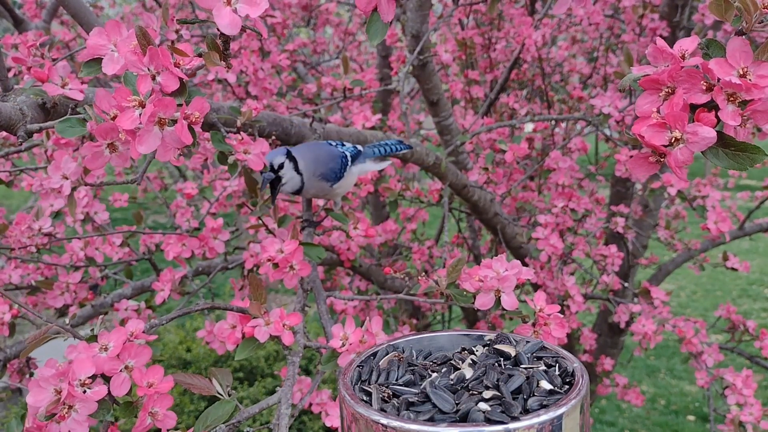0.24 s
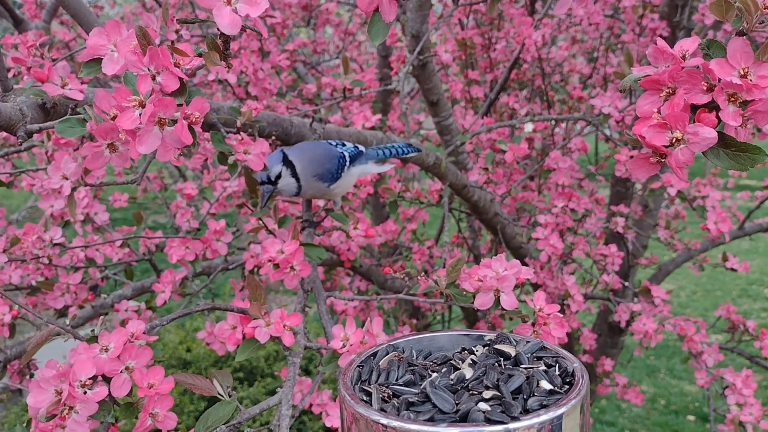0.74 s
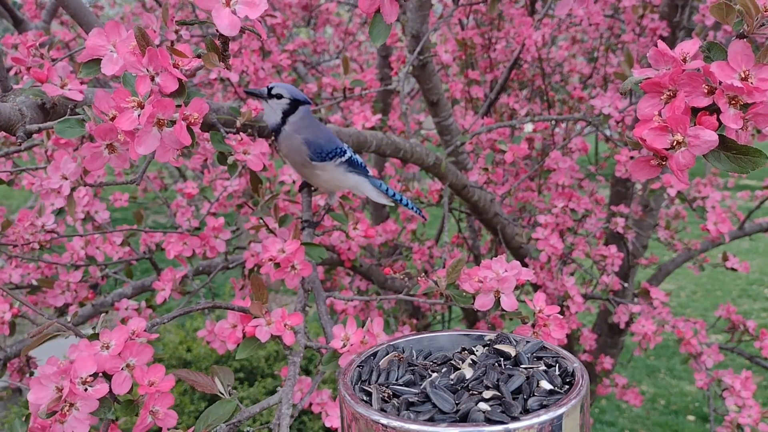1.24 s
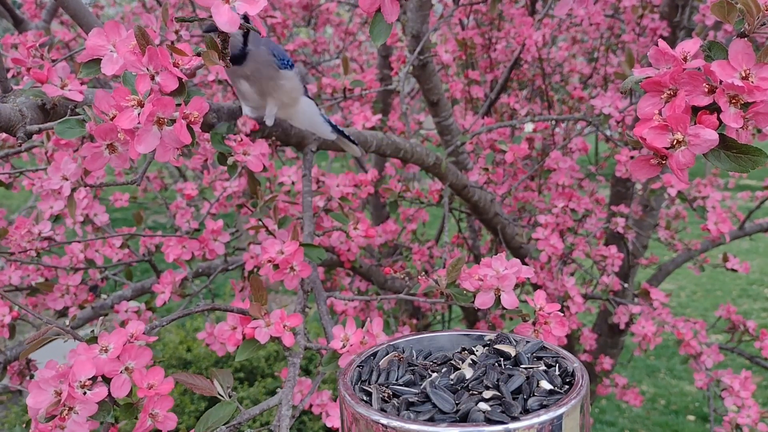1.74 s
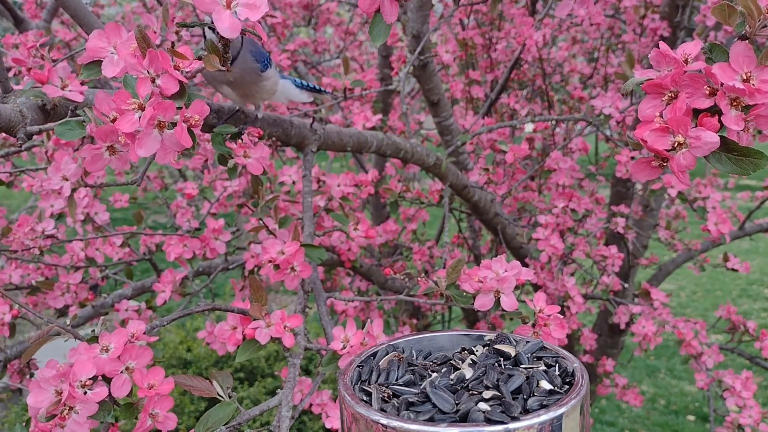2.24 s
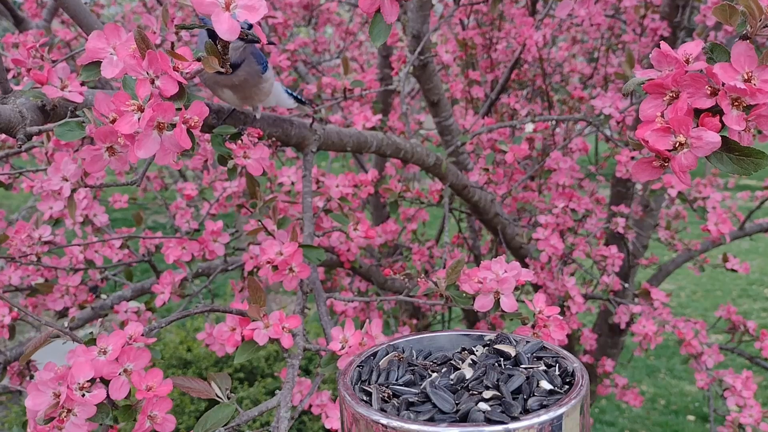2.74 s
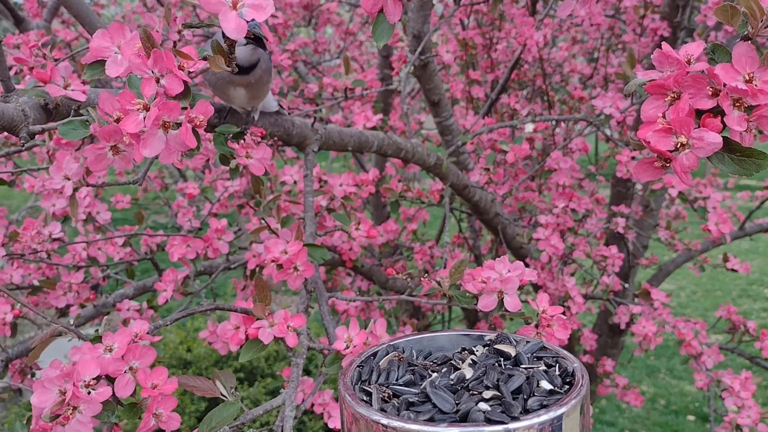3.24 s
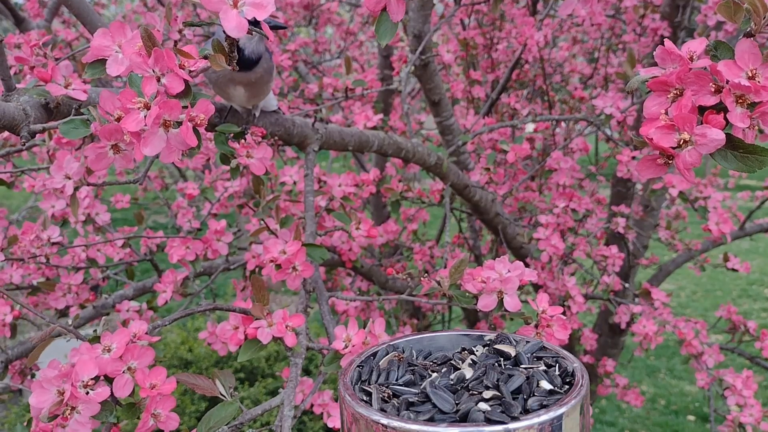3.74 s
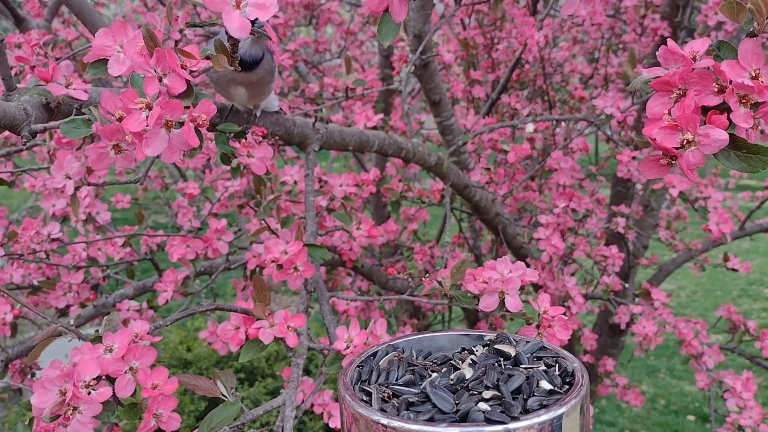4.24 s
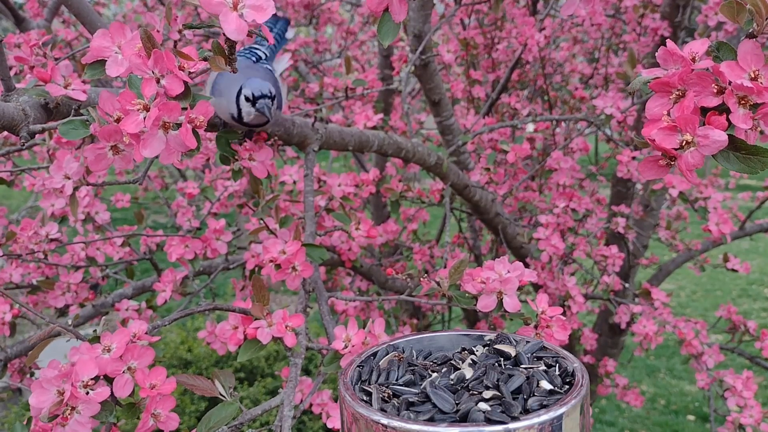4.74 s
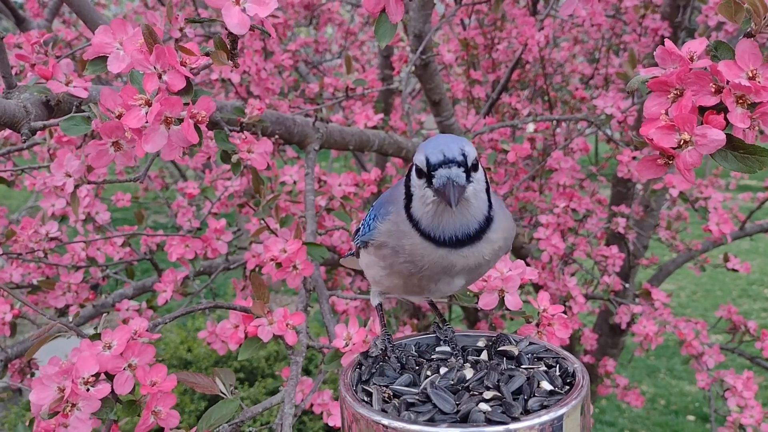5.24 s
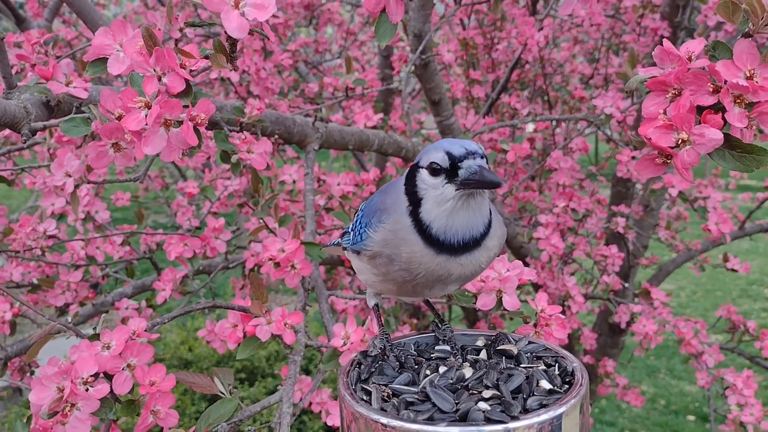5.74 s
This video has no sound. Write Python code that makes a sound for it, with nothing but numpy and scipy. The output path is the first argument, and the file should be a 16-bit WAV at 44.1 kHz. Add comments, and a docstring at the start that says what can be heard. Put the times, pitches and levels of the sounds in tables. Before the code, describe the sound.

Close to the microphone in a quiet garden, a jay gives two loud harsh screams about a second apart. Soft low wing thumps and faint bird whistles follow as it hops, then a third scream. A small chirp falls in pitch, claws click sharply on the feeder, and another jay answers faintly three times far away. Light wind rumble and distant town hum run throughout.

```python
"""A jay on a branch a few steps away screams three times in a garden; another answers far off.
Each scream is a stack of overtones on a fluttering pitch, coloured like throat, mouth and chest.
Small birds whistle with bent, nearly pure tones; claws tick on bark and feeder as short noise snaps.
Low thumps, mostly wing beats as the bird hops, are short pressure pulses.
Light wind buffets the microphone as lumpy low noise, over a distant town hum of steady noise."""
import sys
import numpy as np
from scipy import signal
from scipy.fft import rfft, irfft
from scipy.io import wavfile

SR = 44100
rng = np.random.default_rng(int(sys.argv[2]) if len(sys.argv) > 2 else 0)


def waveform_to_disk(signal):
    """Save audio, clipped to [-1, 1], as 16-bit WAV at the path in sys.argv[1]."""
    frames = np.transpose(np.atleast_2d(signal))
    scaled = np.clip(frames, -1, 1) * 32767
    samples = np.round(scaled).astype(np.int16)
    wavfile.write(sys.argv[1], SR, samples)


N = 264159

# One row per scream, inner times from its start: start t/s, length t/s, climb t/s, beak opens t/s,
# flutter peaks t/s, flutter depth f/Hz, strong-weak cycles t/s, their depth 0-1,
# mouth level/dB, chest level/dB, treble level/dB
SCREAM_CALLS = [(0.207, 0.2674, 0.01353, 0.0733, .14, 21, .035, .25, -16, -24.5, -21),
                (1.074, 0.2628, .012, 0.06, 0.1267, 16.3, .012, .08, -14, -22.5, -22),
                (3.262, 0.255, 0.0088, 0.062, .142, 15, .028, .35, -14, -22.5, -19.5)]
# The voice of each scream, one list per scream: t/s, pitch f/Hz, throat band level/dB
SCREAM_VOICES = [
    [(.208, 833.8, -40), (.24, 836.5, -18), (.262, 823.5, -18), (.285, 829, -11.5), (.31, 833.6, -13),
     (.37, 814.2, -16.5), (.4, 809.4, -14.5), (.428, 820.2, -17), (.44, 794.2, -17.5), (.454, 793, -11.5),
     (.474, 768.8, -13.5)],
    [(1.075, 834, -39.5), (1.11, 831.6, -17.5), (1.135, 811.1, -15), (1.15, 825.4, -15),
     (1.19, 834.4, -12.5), (1.235, 811.1, -14.5), (1.27, 805.3, -12.5), (1.29, 784.4, -14),
     (1.302, 809.8, -14), (1.32, 780.7, -16), (1.339, 777.5, -8)],
    [(3.264, 829.4, -39.5), (3.3, 829.5, -28), (3.33, 811.1, -21), (3.345, 815.9, -17.5),
     (3.375, 819.8, -20.5), (3.4, 834.5, -14.5), (3.43, 804.9, -20), (3.47, 776.8, -17),
     (3.485, 791.9, -21), (3.5, 801.4, -15), (3.519, 801.4, -11.5)],
]


def jay():
    """The near bird: each scream pairs its own settings with its own voice curve."""
    calls = enumerate(zip(SCREAM_CALLS, SCREAM_VOICES))
    return sum(scream(call, voice, number) for number, (call, voice) in calls)


# How the screams reach the left and right ports as the head turns:
# f/Hz, left lead [radians], left-right level/dB in scream one, two, three
HEAD_TO_PORTS = [(810, .6, -2.5, -1.1654, 1.4), (1620, 1.5, 1, 4, 2.5), (2497, 2.2, .5, 2, 1),
                 (3220, 2.737, 4.5, -1.5, -0.35), (4158, 3.9, 4, 7.5, 11), (4850, 3.2, 4, 6, 8),
                 (5700, 4, -0.5, 7, 3.5), (6480, 4.5, -4, 2.5, 5.5), (8150, 6.9, 1.5, -7, -0.19),
                 (11400, 7, -5.5, 2, 1)]
ATTACK_S, ATTACK_DB, RELEASE_S, RELEASE_DB = .004, -24.5, .005, -45.5
CRACK_BEFORE_END_S, CRACK_HZ, CRACK_S = .013, 24.74, .006   # the voice cracks before it stops
HALVING_S = .018   # half length of the strong-weak stretch


def scream(call, voice, number):
    """A vibrating membrane makes partials at whole multiples of one fluttering pitch."""
    start_s, length_s, climb_s, opens_s, flutters_s, depth_hz, halves_s, halving, *band_dbs = call
    at = np.arange(int(start_s * SR), int((start_s + length_s) * SR))
    t, size = at / SR - start_s, len(at)
    k = np.arange(1, 20)[:, None]   # partial numbers
    throat_db = curve(voice, at / SR, 2)
    steady_pitch = curve(voice, at / SR, 1) - SCOOP_HZ * np.exp(-(t / climb_s) ** 2)
    mouth_hz = mouth_resonance(t, opens_s, steady_pitch)
    pitch, flutter = fluttering(steady_pitch, t, flutters_s, depth_hz)
    cracking = np.exp(-((length_s - CRACK_BEFORE_END_S - t) / CRACK_S) ** 2)
    pitch = pitch - CRACK_HZ * cracking
    phase = 2 * np.pi * np.cumsum(pitch) / SR

    gain = voice_colour(k, k * pitch, t, length_s, mouth_hz, throat_db, band_dbs)
    unsteady_db = np.clip(.7 * (k - 4), .8, 4.5)   # high partials swell and fade on their own
    gain = gain * amp(unsteady_db * drifts(20, size, len(k)))
    first_puff = np.exp(-(t / climb_s) ** 2)
    gain = roughened(gain, k, flutter, cracking, first_puff)
    # every other cycle is weaker for a moment
    uneven = np.clip(halving, 0, 1) * np.exp(-((t - halves_s) / HALVING_S) ** 4)
    gain = gain * (1 + uneven * np.clip((k - 1) / 2, 0, 1) * np.cos(phase / 2))

    edges_db = ATTACK_DB * np.clip(1 - t / ATTACK_S, 0, 1)
    edges_db = edges_db + RELEASE_DB * np.clip(1 - (length_s - t) / RELEASE_S, 0, 1)
    out, start_phase = np.zeros((2, N)), rng.uniform(0, 2 * np.pi, k.shape)
    steady_hz = k * 805
    scatter = .5 * (k > 7) * drifts(45, size, len(k))   # leaves scatter the treble unevenly
    for channel, side in enumerate((.5, -.5)):
        heard = gain * amp(side * at_hz(HEAD_TO_PORTS, steady_hz, column=2 + number))
        lead = side * (at_hz(HEAD_TO_PORTS, steady_hz) + scatter)
        partials = heard * np.sin(k * phase + start_phase + lead)
        out[channel, at] = np.sqrt(2) * amp(edges_db) * np.sum(partials, axis=0)
    return signal.sosfilt(signal.butter(4, 600, "high", fs=SR, output="sos"), out)


SCOOP_HZ = 115   # the pitch climbs in from below
FLUTTER_HZ, JITTER_HZ = 165, .7
FLUTTER_REST_HZ, FLUTTER_RISE_S, FLUTTER_FALL_S = 2.0, .035, .06


def fluttering(pitch, t, peak_s, depth_hz):
    """A second, slower oscillator shakes the pitch, most around one moment of the scream."""
    size = len(t)
    width_s = np.where(t < peak_s, FLUTTER_RISE_S, FLUTTER_FALL_S)
    flutter = FLUTTER_REST_HZ + depth_hz * np.exp(-((t - peak_s) / width_s) ** 2)
    beat = 2 * np.pi * np.cumsum(FLUTTER_HZ + 12 * drift(9.8, size)) / SR
    shake = flutter * amp(1.5 * drift(30, size)) * np.sin(beat)
    jitter = (JITTER_HZ + .14 * flutter) * drift(90, size)
    return pitch + shake + jitter, flutter


MOUTH_SHUT_HZ, MOUTH_OPEN_HZ, OPENING_S = 4990, 5462.5, 0.0072


def mouth_resonance(t, opens_s, pitch):
    """Opening the beak raises the mouth's resonance."""
    opened = np.clip((t - opens_s) / OPENING_S + .5, 0, 1)
    mouth_hz = MOUTH_SHUT_HZ + (MOUTH_OPEN_HZ - MOUTH_SHUT_HZ) * opened
    return mouth_hz * np.minimum(pitch / 810, 1)   # the resonance follows the climbing pitch


# How the other bands build and fade in every scream:
# share of its length [0-1], mouth level/dB, chest level/dB, treble level/dB
BAND_BLOOM = [(0, -7.5, -13, -13), (.05, -12.5, -17, -15), (.13, -6.5, -5.5, -7.5), (.23, -4, -9, -4),
              (.3, 2.5, -1, 0.5), (.5, -1, -0.5, -0.5), (.75, 0, 1, -0.5), (.86, -2.5, 1, -5),
              (.93, -1, -1, -2.5), (1, -11, 7, -6)]
# Colour of the low partials, before the chest level is added: f/Hz, level/dB
CHEST_COLOUR = [(810, -20), (1620, -11), (2430, -1.5), (3000, -21.5)]
# Colour of the high partials, before the treble level is added: f/Hz, level/dB
TREBLE_COLOUR = [(5900, -28.5), (6510, 1), (7260, -2.5), (8330, -4.5), (9000, -12), (11400, -7),
                 (13200, -10), (14200, -24.5), (15800, -20)]
THROAT_HZ, THROAT_WIDTH_HZ, MOUTH_WIDTH_HZ = 3244, 460, 570
BRIDGE_HZ, BRIDGE_DB = 4204, -7.5   # partial between the two resonances


def voice_colour(k, hz, t, length_s, mouth_hz, throat_db, band_dbs):
    """Throat and mouth resonances lift nearby partials; chest and treble fill in below and above."""
    share = t / length_s
    mouth_db, chest_db, treble_db = (db + curve(BAND_BLOOM, share, c) for c, db in enumerate(band_dbs, 1))

    def bump(centre_hz, width_hz):
        """A smooth hill of gain around one frequency."""
        return np.exp(-((hz - centre_hz) / width_hz) ** 2)
    mouth = bump(mouth_hz, MOUTH_WIDTH_HZ)
    mouth = mouth / np.sqrt(np.sum(mouth ** 2, axis=0))
    chest = amp(chest_db + at_hz(CHEST_COLOUR, hz)) * (k < 4)
    chest[0] *= np.clip(t / 0.03, 0, 1) ** 2   # the lowest partial builds late
    throat = bump(THROAT_HZ, THROAT_WIDTH_HZ) + amp(BRIDGE_DB) * bump(BRIDGE_HZ, 410)
    treble = amp(treble_db - 6.0 + at_hz(TREBLE_COLOUR, hz)) * (k > 7)
    return amp(throat_db) * throat + amp(mouth_db) * mouth + chest + treble


RASP_DB = -47   # starting point, raised with partial number and flutter


def roughened(gain, k, flutter, cracking, first_puff):
    """Turbulent air spreads noise around partials, more in treble, flutter, crack and first puff."""
    rasp = amp(RASP_DB + 2.0 * k + .3 * flutter)
    rasp = rasp + 1.2 * cracking * np.clip((k - 1) / 3, 0, 1) + 1.0 * first_puff
    noise = drifts(210, len(flutter), len(k))
    return gain * (1 + rasp * (k > 1) * noise) / np.sqrt(1 + rasp ** 2)


# Screams of the far jay: start t/s, length t/s, starting pitch f/Hz, level/dB before its colour
FAR_SCREAMS = [(5.078, 0.2814, 803, -72.5), (5.399, 0.283, 797.3, -84), (5.763, .29, 808.1, -66)]
# Colour of the far jay's partials: f/Hz, level/dB
FAR_JAY_COLOUR = [(1600, -33), (2400, -9), (3200, -8), (4000, -19), (4850, -18), (5650, -19), (6450, -28),
                  (7200, -24), (9000, -42)]
FAR_FADE_S, FAR_FADE_DB, FAR_SAG_HZ_PER_S = .05, -13, 50


def far_jay():
    """The same kind of scream, dulled by distance; moving air makes each partial flicker."""
    out, flicker = 0, amp(3.6 * drifts(15.83, N, 11))
    for s, length_s, hz, db in FAR_SCREAMS:
        times = np.array([0, FAR_FADE_S, length_s - FAR_FADE_S, length_s])
        levels_db = db + FAR_FADE_DB * np.array([1, 0, 0, 1])
        rows = np.transpose([s + times, hz - FAR_SAG_HZ_PER_S * times, levels_db])
        for k in range(2, 11):
            partial = [(k, at_hz(FAR_JAY_COLOUR, 800 * k))]
            out = out + tone(rows, partial, waver_hz=7.477) * flicker[k]
    return out


# Whistles of small birds: start t/s, length t/s, first f/Hz, middle f/Hz, last f/Hz,
# peak level/dB, left-right level/dB
BIRD_WHISTLES = [(.062, .084, 3350, 4520, 3270, -72, -1.5), (0, .2, 2300, 2780, 2950, -79, 0),
                 (0, .15, 2135, 2090, 2030, -80, 1), (1.92, .04, 2700, 2622, 2550, -77, .5),
                 (2.015, .045, 2650, 2400, 2290, -78, 2), (2.21, .04, 4200, 4000, 3406, -79, 1.5),
                 (2.365, .055, 4300, 3760, 3700, -78, -4.5), (2.4, .08, 2450, 2720, 2400, -81, -.5),
                 (2.773, .009, 5300, 5760, 6900, -74, -1), (3.84, .1, 2243, 2640, 2920, -74, 2.5),
                 (3.938, .038, 3700, 4160, 3700, -66.5, -2.5), (4.87, .18, 2092, 2085, 2090, -82, 6.5),
                 (4.938, .027, 6900, 7450, 7130, -70, -6.5), (5.49, .25, 2680, 2675, 2684, -78, 4)]
# Two voices of thin high notes: first note t/s, f/Hz, first level/dB, number of notes
THIN_TRILL = [(2.425, 10420, -79, 4), (2.445, 6630, -85, 3)]
# Falling chirp of a nearer bird, in parts: notes (t/s, f/Hz, level/dB),
# then overtones (multiple of f, level/dB)
FALLING_CHIRP = [([(4.113, 3815, -70), (4.119, 3800, -54), (4.14, 3760, -52), (4.155, 3500, -55),
                 (4.168, 3380, -59), (4.178, 3200, -74)], [(1, 0), (2, -32), (3, -34)]),
                 ([(4.168, 5100, -80), (4.18, 4800, -63), (4.19, 4650, -80)], [(1, 0)]),
                 ([(4.182, 1770, -70), (4.192, 1730, -56), (4.21, 1650, -52), (4.24, 1530, -56),
                 (4.252, 1380, -73), (4.275, 1250, -80)], [(1, -17), (2, 0), (3, -22), (4, -21), (5, -28),
                 (6, -28), (7, -29)])]
TRILL_GAP_S, TRILL_FADE_DB = .062, -1.2   # from one note to the next


def songbirds():
    """Whistles, a thin trill and one falling chirp, all from gliding sine waves."""
    out = sum(pan(whistle(*note), side_db) for *note, side_db in BIRD_WHISTLES)
    for first_s, hz, first_db, notes in THIN_TRILL:
        for note in range(notes):
            s, db = first_s + TRILL_GAP_S * note, first_db + TRILL_FADE_DB * note
            # each note slides up into its pitch
            rows = [(s - .018, .8 * hz, db - 13), (s - .011, .96 * hz, db - 8),
                    (s - .008, hz, db), (s + .008, hz, db), (s + .012, hz, db - 15)]
            out += tone(rows, [(1, 0)], waver_hz=60)
    return out + sum(pan(tone(rows, overtones, waver_hz=21), -2.0) for rows, overtones in FALLING_CHIRP)


WHISTLE_FADE_DB = -10   # at both ends of a whistle


def whistle(s, length_s, first_hz, middle_hz, last_hz, db):
    """A note bent smoothly through three pitches, swelling and fading."""
    u = np.linspace(-1, 1, 21)   # from start to end of the note
    slope, bend = (last_hz - first_hz) / 2, (first_hz + last_hz) / 2 - middle_hz
    hz = middle_hz + slope * u + bend * u ** 2
    rows = np.transpose([s + length_s * (u + 1) / 2, hz, db + WHISTLE_FADE_DB * u ** 2])
    return tone(rows, [(1, 0)], waver_hz=12)


# Claws and seed husks: t/s, level/dB before a common trim
CLAW_TICKS = [(1.8393, -71), (1.9377, -49.5), (1.9792, -64), (4.9194, -55.5), (4.9344, -59), (5.0394, -54),
              (5.0544, -55), (5.1844, -35.5), (5.187, -46.5), (5.1943, -47.5), (5.2048, -54.5),
              (5.2331, -54.5), (5.2494, -51.5), (5.3373, -51), (5.897, -43)]
# Colour of one tick: f/Hz, relative level/dB per Hz
TICK_COLOUR = [(880, -28), (1500, -2), (3860, -5.5), (7040, 1.5), (8920, -5), (12800, -0.5), (15800, -3.5)]


def ticks():
    """A bright snap of noise with a short scratchy tail."""
    out, t = np.zeros((2, N)), np.arange(3000) / SR
    for s, db in CLAW_TICKS:
        snap = amp(-60 * t / 0.0112)
        scratch = amp(-14.5 - 60 * t / 0.161 + 3.2 * drift(360, 3000))
        noise = rms_one(irfft(shaped(TICK_COLOUR, size=3000)[0][0]))
        at = int(s * SR)
        out[:, at:at + 3000] += noise * amp(db - 8.5) * (snap + scratch)
    return out


# Low thumps, mostly wing beats as the bird hops: t/s, level/dB, left-right level/dB
LOW_THUMPS = [(0.273, -45, 11), (0.733, -45, 3.5), (1.314, -51, 6), (1.612, -39, 19), (1.644, -36.5, 18.5),
              (1.729, -39.5, 9.5), (1.802, -46, 14), (1.888, -46, 15), (1.909, -42.5, 12.5), (2.0, -53, 11)]
THUMP_HZ, THUMP_SPREAD = 98, .12   # typical pitch, and its random spread as a share


def thumps():
    """Each thump is a cycle or two of low pressure."""
    out, t = np.zeros((2, N)), np.arange(-1300, 1300) / SR
    for s, db, side_db in LOW_THUMPS:
        at = int((s + .01) * SR) - 1300
        hz = THUMP_HZ * (1 + THUMP_SPREAD * rng.standard_normal())
        pulse = np.exp(-(t / 0.0061) ** 2) * np.sin(2 * np.pi * hz * t)
        out[:, at:at + 2600] += pan(amp(db) * pulse, side_db)
    return out


# Buffeting on the ports: t/s, level/dB before a common lift, left-right level/dB
WIND_STRENGTH = [(0.0, -77, 3), (0.33, -52, 6.5), (1.1, -61.5, -0.5), (1.35, -43, 4), (1.53, -68.5, 5.5),
                 (1.62, -51.5, 12), (1.87, -57, -3), (2.33, -62.5, 9), (2.75, -63.5, -3.5),
                 (2.94, -61, 13.5), (3.04, -67.5, -2.5), (3.37, -53, 6.0), (4.02, -65.5, -0.5),
                 (4.74, -59.5, 10.5), (4.94, -63, 2.5), (5.99, -61, 3)]
# Colour of the buffeting: f/Hz, relative level/dB per Hz
BUFFET_COLOUR = [(25, -24), (45, -5.5), (70, 1.5), (105, 1.5), (160, -8), (260, -22.5), (500, -59.5),
                 (1000, -120)]


def wind():
    """Lumpy low noise, its own in each port."""
    t = np.arange(N) / SR
    db, side_db = curve(WIND_STRENGTH, t, 1), curve(WIND_STRENGTH, t, 2)
    lumps = amp(2.5 * drifts(12, N, 2))
    buffeting = rms_one(irfft(shaped(BUFFET_COLOUR)[0], N) * lumps)
    return pan(buffeting * amp(db + 4.5), side_db)


# Colour of town hum and microphone hiss: f/Hz, relative level/dB per Hz
HUM_COLOUR = [(71, -31.5), (120, -8.5), (177, -11.5), (236, -9.5), (377, -17), (696, -19), (1090, -24.5),
              (1180, -25.5), (2330, -37), (4760, -46.5), (7160, -44), (15900, -49)]
# How alike left and right are: f/Hz, likeness [-1 opposite, 0 unrelated, 1 same]
LEFT_RIGHT_LIKENESS = [(130, 0.57), (290, 0.926), (640, 0.38), (1400, -0.79), (3100, 0.9), (6800, .35),
                       (15000, 1)]
HUM_DB = -61.5


def hum():
    """Steady background noise, alike in both ports by band."""
    (mid, side), hz = shaped(HUM_COLOUR)
    alike = np.clip(at_hz(LEFT_RIGHT_LIKENESS, hz), -1, 1)
    both = np.sqrt(1 + alike) * mid + np.sqrt(1 - alike) * side * [[1], [-1]]
    return amp(HUM_DB) * rms_one(irfft(both * (hz > 110), N))


# Smeared echoes: delay t/s, level/dB against the fast decay, dull above f/Hz
GARDEN_ECHOES = [(.04, -5.5, 9018), (.1, -20.5, 3978)]
NEAR_T60_S, FAR_T60_S, FAR_CUT_HZ = 0.24, 1.5, 4000   # foliage and walls; distant houses
ECHO_SMEAR_S = .018


def garden(x, near_db, far_db):
    """A fast dense decay, a few smeared echoes and a faint dull tail from far walls."""
    t = np.arange(2 * SR) / SR
    near = rng.standard_normal((2, len(t))) * amp(-60 * t / NEAR_T60_S) * np.clip(t / .004, 0, 1)
    far = rng.standard_normal((2, len(t))) * amp(-60 * t / FAR_T60_S) * np.clip(t / .1, 0, 1)
    near, far = lowpass(near, 1, 7000), lowpass(far, 3, FAR_CUT_HZ)
    reply, tail = amp(near_db) * energy_one(near), amp(far_db) * energy_one(far)
    for s, db, dull_hz in GARDEN_ECHOES:
        smear = rng.standard_normal(far.shape) * np.exp(-((t - s) / ECHO_SMEAR_S) ** 2)
        smear = lowpass(smear + 1e-18, 1, dull_hz)
        tail += amp(near_db + db) * energy_one(smear)
    stirred = x * (0.94 + .45 * drift(45, N))
    blurred = x * (.6 + .8 * drift(150, N))   # moving air and leaves smear the long paths
    wet = signal.fftconvolve(stirred, reply, axes=1) + signal.fftconvolve(blurred, tail, axes=1)
    return wet[:, :N]


def amp(db):
    """Turn dB into gain."""
    return 10 ** (np.asarray(db) / 20)


def curve(table, at, column):
    """Read one column of a table, joining its points with straight lines."""
    return np.interp(at, np.array(table)[:, 0], np.array(table)[:, column])


def at_hz(points, hz, column=1):
    """Read a table on a log-frequency axis."""
    return np.interp(np.log(hz), np.log(np.array(points)[:, 0] + 1), np.array(points)[:, column])


def span(rows):
    """Find the samples under a curve table and join its columns in time."""
    s, *columns = np.transpose(rows)
    at = np.arange(int(max(s[0], 0) * SR), min(int(s[-1] * SR), N))
    return slice(at[0], at[-1] + 1), [np.interp(at / SR, s, c) for c in columns]


def drift(rate_hz, size):
    """Slow random wandering of spread 1."""
    r = np.exp(-2 * np.pi * rate_hz / SR)
    slow = signal.lfilter([1], [1, -2 * r, r * r], rng.standard_normal(size + 8000))[8000:]
    return slow / slow.std()


def drifts(rate_hz, size, count):
    """Several unrelated drifts, one per row."""
    return np.array([drift(rate_hz, size) for _ in range(count)])


def shaped(spectrum, size=N):
    """Two unrelated noise spectra under a colour, with their frequencies."""
    hz = np.maximum(np.fft.rfftfreq(size, 1 / SR), 1)
    return rfft(rng.standard_normal((2, size))) * amp(at_hz(spectrum, hz)), hz


def lowpass(x, order, hz):
    """Dull a sound above a frequency."""
    return signal.sosfilt(signal.butter(order, hz, fs=SR, output="sos"), x)


def rms_one(x):
    """Scale to an average strength (rms) of 1."""
    return x / np.sqrt(np.mean(x ** 2))


def energy_one(x):
    """Scale a stereo echo so its two sides have energy 1 on average."""
    return x / np.sqrt(np.sum(x ** 2) / 2)


def pan(x, db):
    """Place a sound by its left-right level."""
    return x * amp(np.array([db / 2, -db / 2])).reshape(2, -1)


def tone(rows, overtones, waver_hz):
    """A gliding note with overtones and a slightly wavering pitch."""
    out, (where, (hz, db)) = np.zeros(N), span(rows)
    phase = 2 * np.pi * np.cumsum(hz + waver_hz * drift(80, len(hz))) / SR
    waves = sum(amp(o_db) * np.sin(k * phase + k * k) for k, o_db in overtones)
    out[where] = np.sqrt(2) * amp(db) * waves
    return out


def scene():
    """All sources in the garden; far birds are heard with more echo."""
    near_jay = jay()
    distant = songbirds() + pan(far_jay(), 2.5)
    space = garden(near_jay, near_db=-19.5, far_db=-50) + garden(distant, near_db=-5, far_db=-20)
    return near_jay + distant + space + ticks() + thumps() + wind() + hum()


CUTOFF_HZ = 16550


def record(dry):
    """The loudest peaks bend over just below full scale, then the top is cut."""
    rounded = dry / (1 + np.abs(dry / .97) ** 5) ** (1 / 5)
    return signal.sosfilt(signal.cheby2(22, 110, CUTOFF_HZ, fs=SR, output="sos"), rounded)


dry = scene()
out = record(dry)
waveform_to_disk(out)
```